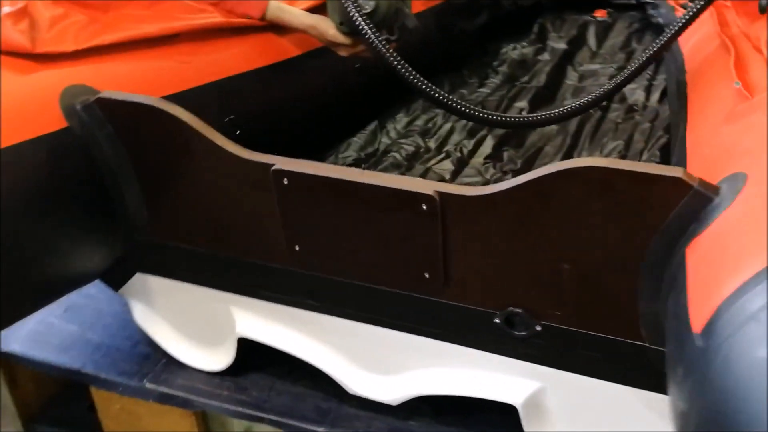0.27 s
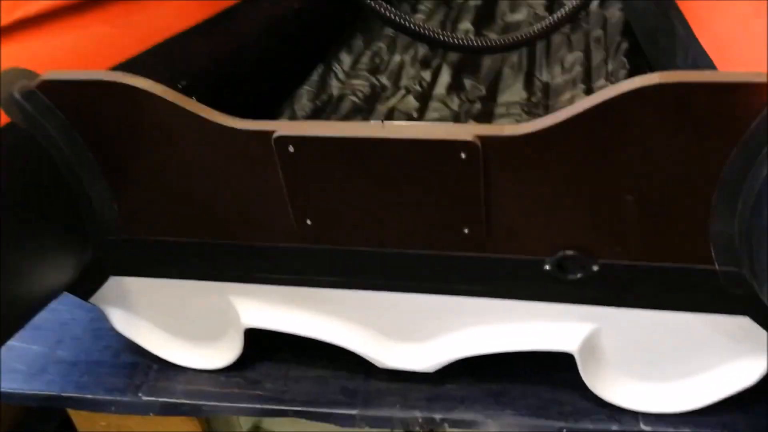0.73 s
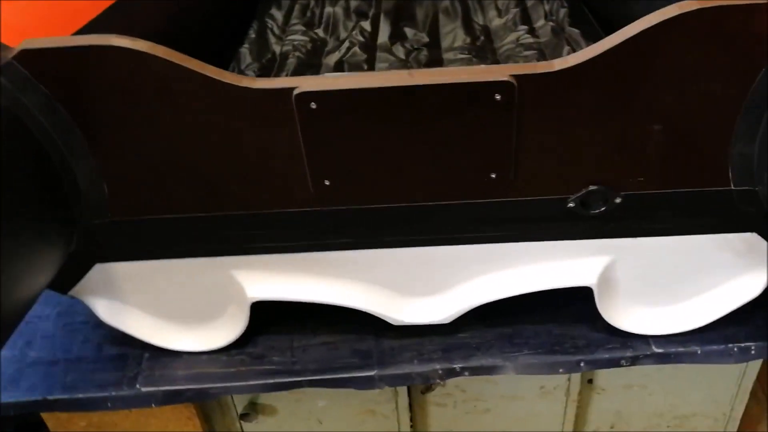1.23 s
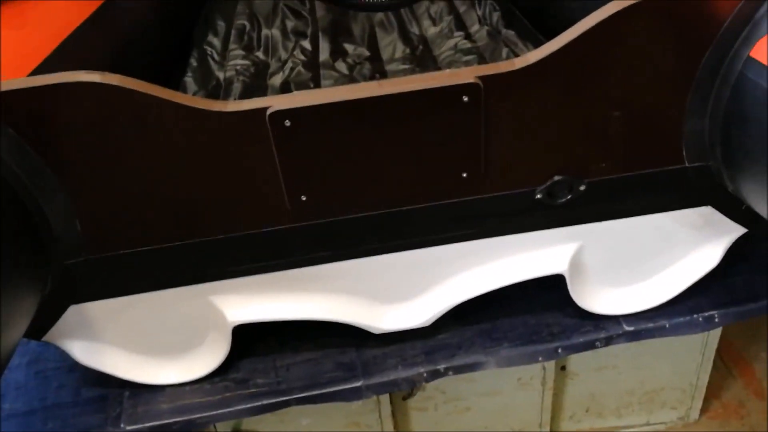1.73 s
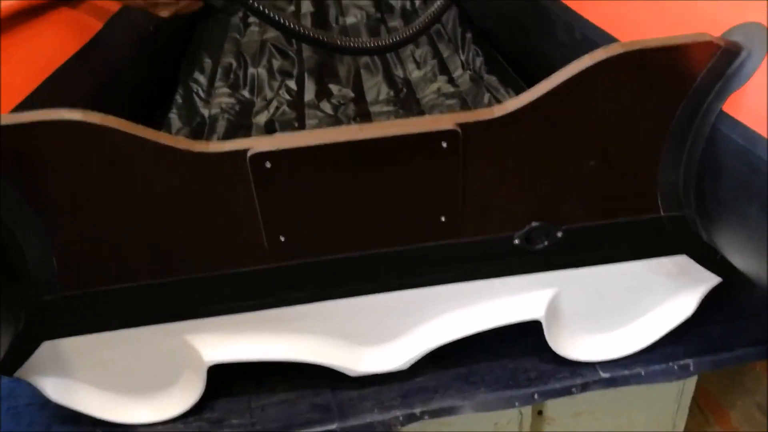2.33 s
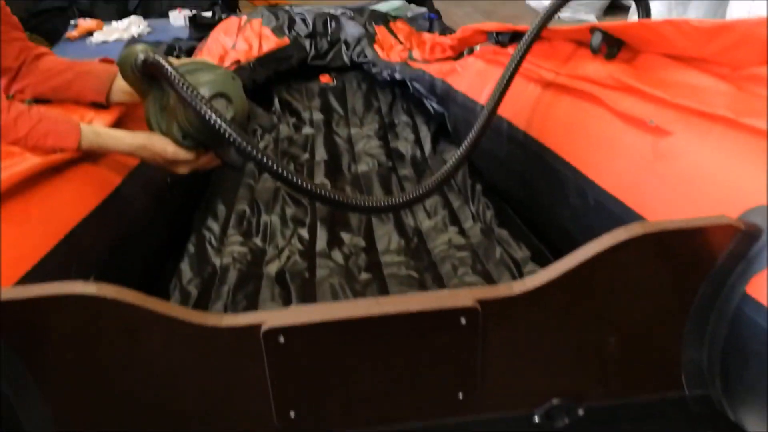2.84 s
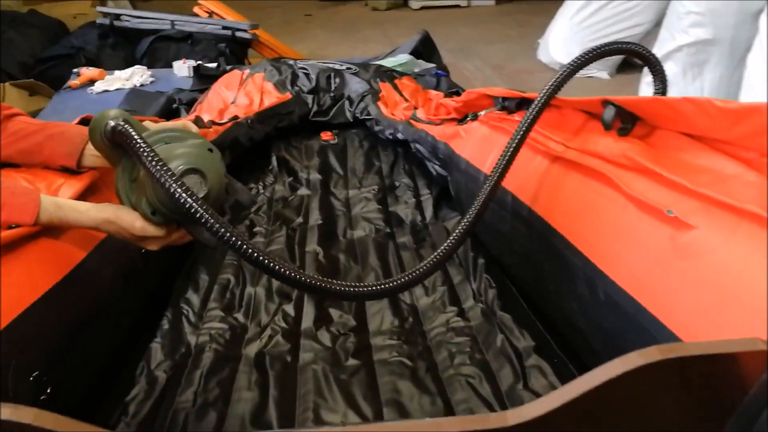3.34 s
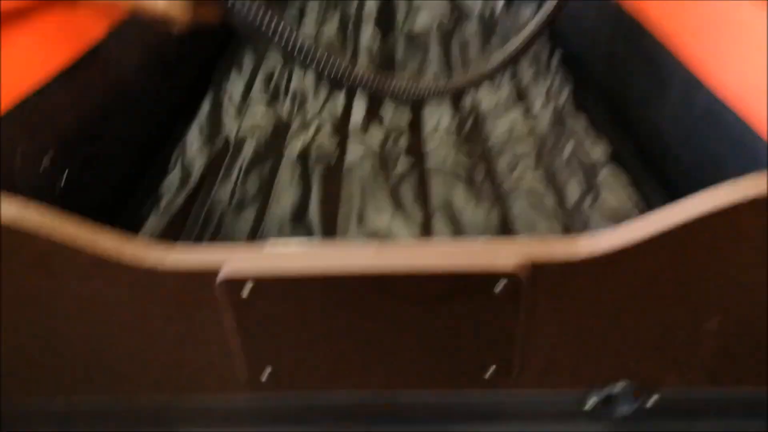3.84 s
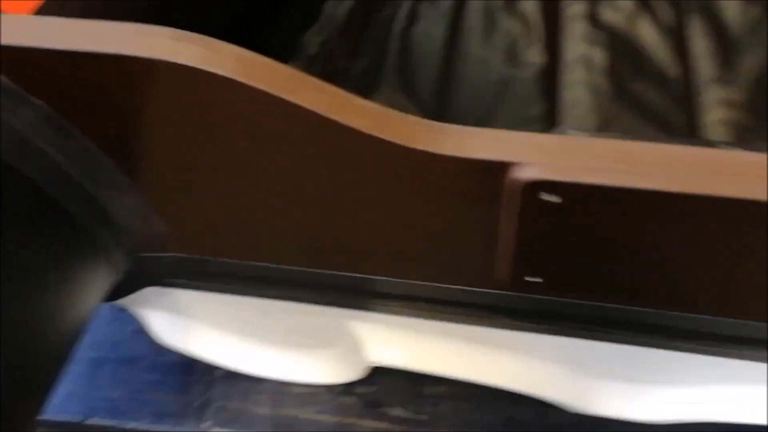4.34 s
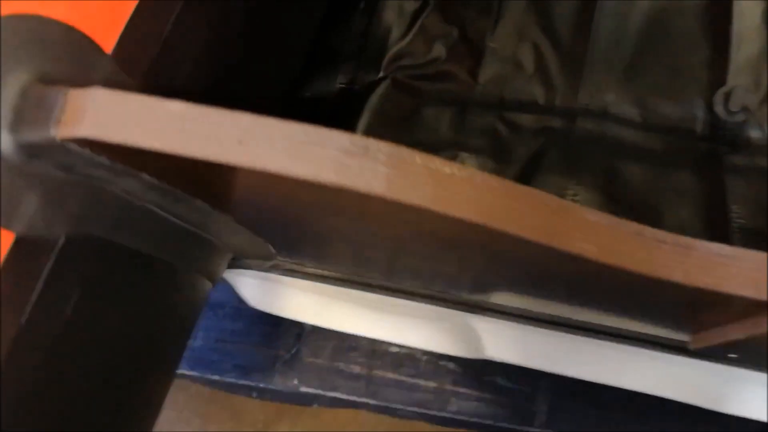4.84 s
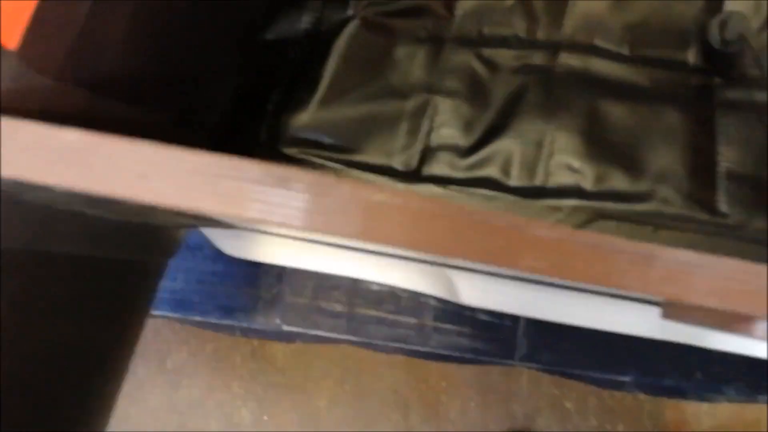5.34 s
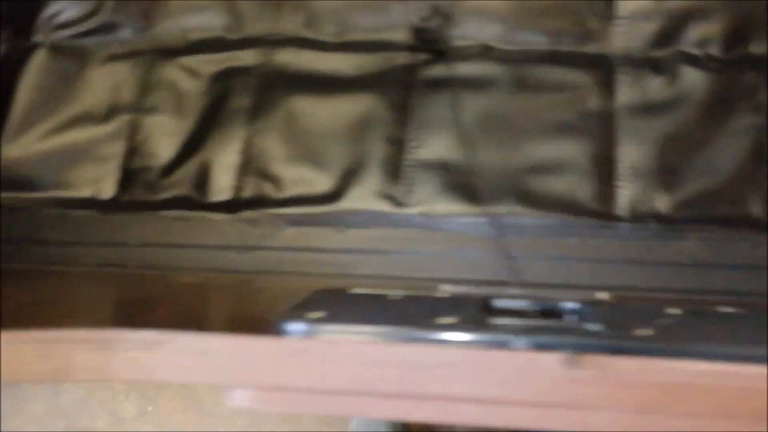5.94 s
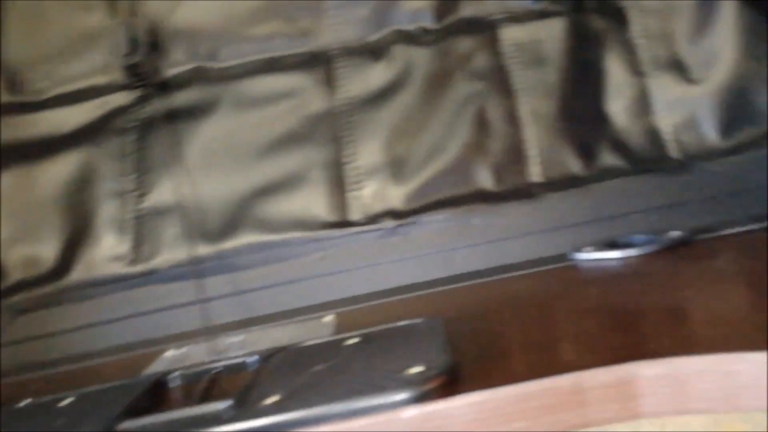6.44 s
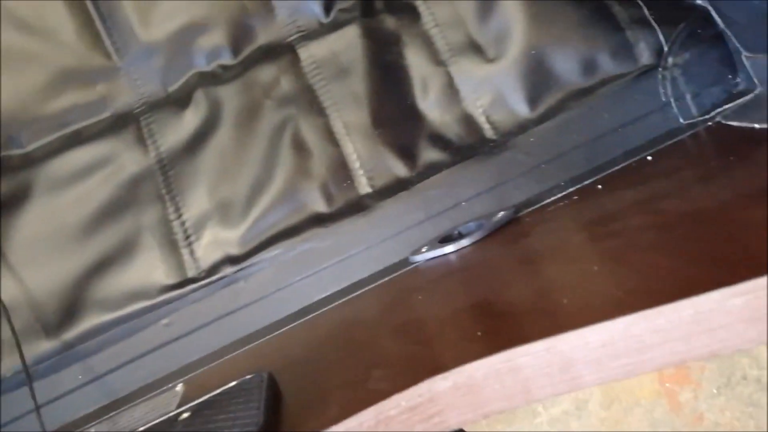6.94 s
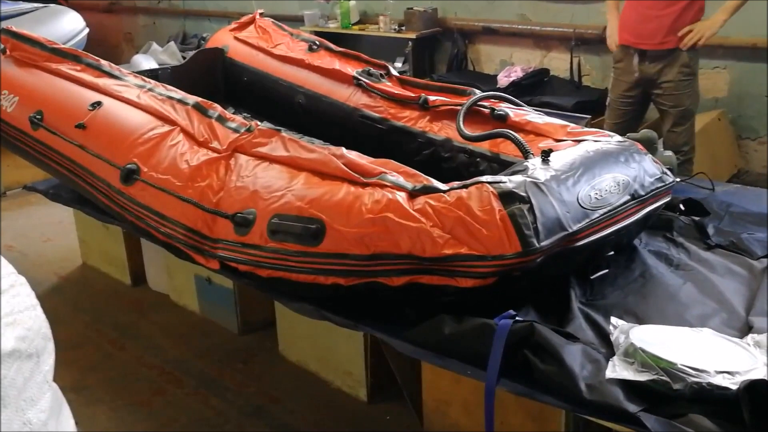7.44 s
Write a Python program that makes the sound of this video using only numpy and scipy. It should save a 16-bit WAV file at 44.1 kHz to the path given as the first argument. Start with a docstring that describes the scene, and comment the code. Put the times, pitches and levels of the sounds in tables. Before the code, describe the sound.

From 0 s an electric air pump runs close by, blowing through a ribbed hose into an inflatable boat: a broad, bright, sizzling rush with a high whine near 4 kHz, fluttering and barely rising, over faint low hum and room rumble. Between 0.1 and 1 s soft, low thumps and draught buffet the handheld microphone; hollow resonances shift as it moves. At about 3.8 s the pump is switched off; two strong bumps of air follow at 4.0 and 4.2 s. The fan coasts down, its harmonics sliding lower and flaring into brief whistles from 4 to 5.2 s, while nearby hiss swells, then dulls and weakens. From 5.2 s a thin, rough whine sinks intermittently, with faint low hum after 6.2 s. Around 7.13 s comes a tiny break, then steady pump hiss from farther off, with faint fixed high tones and low rumble, until the end near 7.6 s.

```python
"""An electric air pump blows through a ribbed hose into an inflatable boat; a phone is carried past the stern.
Under power, shaped noise hisses, shaft harmonics whine, and low noise bursts thump as a draught on the microphone.
Switched off, the seven-blade fan coasts down: its harmonics fall and flare into whistles, then a thin whine sinks.
After a short break the pump runs steadily further away: hiss, fixed faint tones and a low rumble."""
import sys
import numpy as np
from scipy import signal
from scipy.fft import rfft, irfft
from scipy.io import wavfile

SR = 44100
rng = np.random.default_rng(int(sys.argv[2]) if len(sys.argv) > 2 else 0)


def digitize_waveform(pressure):
    """Quantize a signal to 16-bit integers and store it at the path in sys.argv[1].

    Rows of a 2-D input are taken as channels; values are limited to [-1, 1].
    """
    field = np.atleast_2d(pressure).T
    bounded = np.clip(field, -1, 1)
    quanta = np.round(bounded * 32767).astype(np.int16)
    wavfile.write(sys.argv[1], SR, quanta)


N = 338688
T = np.arange(N) / SR
BINS_HZ = np.arange(N // 2 + 1) * SR / N

BLADES = 7
BLADE_HZ, CREEP_HZ_PER_S = 4101, 8.3  # blade-passing rate at time 0, and its rise under power
OFF_S, DRAG_S, FRICTION_HZ_PER_S = 3.816, 1.348, 128.3  # air drag alone halves the speed in DRAG_S
BREAK_S = 7.129


def undb(db):
    """Amplitude of a level in dB."""
    return 10 ** (np.asarray(db) / 20)


def unit(x):
    """Scale to RMS 1 over all channels."""
    return x / np.sqrt(np.mean(x ** 2))


def curves(rows):
    """Each column of a table, joined by straight lines in time."""
    time_s, *columns = np.transpose(rows)
    return [np.interp(T, time_s, column) for column in columns]


def colour_db(points):
    """dB per bin of a (frequency [Hz], level [dB]) table, straight over log frequency."""
    hz, db = np.transpose(points)
    return np.interp(np.log(BINS_HZ + 1), np.log(hz), db)


def colour(points):
    """Gain per bin of a (frequency [Hz], level [dB]) table."""
    return undb(colour_db(points))


def band(lo_hz, hi_hz, order=8):
    """Gain per bin of a Butterworth-shaped band-pass."""
    low_cut = 1 + (lo_hz / (BINS_HZ + 1)) ** (2 * order)
    high_cut = 1 + (BINS_HZ / hi_hz) ** (2 * order)
    return 1 / np.sqrt(low_cut * high_cut)


def noise(gain, alike=0):
    """Stereo noise of RMS 1 and the given colour; a share of its power is common to both sides."""
    white = rng.standard_normal((3, N))
    mixed = np.sqrt(alike) * white[2] + np.sqrt(1 - alike) * white[:2]
    return unit(irfft(rfft(mixed) * gain, N))


def pan(db):
    """Left and right gains of constant total power; db is left minus right."""
    gains = undb(np.array([[.5], [-.5]]) * db)
    return gains / np.sqrt(np.mean(gains ** 2, axis=0))


def walk(rate_hz):
    """Smooth random curve of RMS 1, low-passed around rate_hz."""
    return unit(irfft(rfft(rng.standard_normal(N)) * np.exp(-(BINS_HZ / rate_hz) ** 2), N))


def swell(centre_s, half_s):
    """Smooth rise and fall around a moment."""
    return np.square(.5 + .5 * np.cos(np.pi * np.clip((T - centre_s) / half_s, -1, 1)))


def spell(start_s, end_s, release_s, attack_s=0.031):
    """Linear attack, hold and release."""
    return np.clip(np.minimum((T - start_s) / attack_s, 1 - (T - end_s) / release_s), 0, 1)


def whine(hz, wobble=.001, flutter_db=3, port_phase_rad=0.46):
    """Rotor tone: the shaft wobbles in pitch, the air stream shakes the level at each port."""
    phase = 2 * np.pi * np.cumsum(hz * (1 + wobble * walk(23.5))) / SR
    ports = [np.sin(phase - side * port_phase_rad) * undb(flutter_db * walk(33)) for side in range(2)]
    return unit(np.array(ports))


def blade_rate():
    """Blade-passing rate [Hz]: slow creep under power, then air drag and bearing friction."""
    coast_s = np.maximum(T - OFF_S, 0)
    at_power_hz = BLADE_HZ + CREEP_HZ_PER_S * np.minimum(T, OFF_S)
    return at_power_hz / (1 + coast_s / DRAG_S) - FRICTION_HZ_PER_S * coast_s


def speed_db():
    """Fan speed in dB re BLADE_HZ."""
    return 20 * np.log10(blade_rate() / BLADE_HZ)


def sizzle_peak(centre_hz=8650, width_hz=1300, boost_db=2):
    """Resonance that gives the hiss its edge."""
    return undb(boost_db / (1 + ((BINS_HZ - centre_hz) / (width_hz / 2)) ** 4))


def hull_echoes(x, share=0.14, drift_s=0.000174):
    """Reflections from tubes and transom; their paths drift as the phone moves, so the hiss phases."""
    out = x.copy()
    for side in range(2):
        for lag_s in (.0013, .0031, .0057, .011):
            out[side] += share * np.interp(T - lag_s - drift_s * walk(0.92), T, x[side])
    return out / np.sqrt(1 + 4 * share ** 2)


# air noise, nominal: (low edge [Hz], high edge [Hz], level at full speed [dB], loss per dB of speed [dB/dB],
# share of closeness gain [1], change when facing the pump [dB], share of turn [1])
AIR_BANDS = [(590, 2650, -31, 0.8, 0.2, -0.5, 0.74), (2820, 7760, -22, 1.25, 0.36, 2, 1.0),
             (8220, 9020, -19.5, 1.88, 0.72, -3, 0.63), (11320, 17000, -26.5, 1.93, 0.96, 0, 0.22)]
# hiss colour under power: (frequency [Hz], relative level per Hz [dB])
RUN_COLOUR = [(240, -59), (400, -34), (543, -28), (605, -22.5), (886, -19.5), (1150, -13), (1380, -19),
              (3210, -9), (3790, -14), (4220, -10.5), (7100, -10), (8530, -3.5), (9650, -5.5),
              (10600, -13.5), (15500, -28)]
# hiss colour while coasting: (frequency [Hz], relative level per Hz [dB])
COAST_COLOUR = [(240, -46), (400, -6), (595, -10), (738, -0.5), (886, -2.5), (1450, -2.5), (1820, -4),
                (2220, -3), (3360, -3.5), (3850, -3.5), (4220, -4), (6990, -8.5), (8930, 4.5),
                (12100, -3.5), (15500, -14)]
# port imbalance before an overall offset: (frequency [Hz], left minus right [dB])
EAR_TILT = [(500, 0.5), (2000, -5), (3500, -1), (6500, -1), (8300, 14), (9300, 4), (10500, -0.5),
            (12500, -16), (15500, -8)]
# gain near the air stream, before each band's share: (time [s], gain [dB])
CLOSENESS = [(0, -3.5), (1.4, 1.5), (2.6, 0), (3.85, 1.5), (4.08, 0.5), (4.3, 6.5), (4.77, 7.5), (5.25, 7),
             (5.9, 3.5), (7.05, -1.5)]
# turning phone, before offset and share: (time [s], left minus right [dB])
TURN = [(0.05, 1.5), (3.44, 6.5), (4.64, 0.5), (5.48, 0.5), (5.52, 2), (5.79, 4), (6.26, 2.5), (7.04, 6.5)]


def air(side_db=5.0, dulling_s=1.0, facing_s=3.39, facing_half_s=1):
    """Turbulence in hose and intake: rush, hiss, sizzle and thin top, weaker and duller as the fan slows."""
    close_db, = curves(CLOSENESS)
    turn_db = curves(TURN)[0] - side_db
    facing, slowed_db = swell(facing_s, facing_half_s), speed_db()
    coasting = np.clip((T - OFF_S) / dulling_s, 0, 1)
    ears = pan(side_db + colour_db(EAR_TILT))
    out = 0
    for lo_hz, hi_hz, db, steepness, closing, facing_db, turning in AIR_BANDS:
        zone = band(lo_hz, hi_hz) * ears
        driven = noise(zone * colour(RUN_COLOUR) * sizzle_peak(), alike=0.033)
        free = noise(zone * colour(COAST_COLOUR), alike=0.06)
        stream = np.sqrt(1 - coasting) * driven + np.sqrt(coasting) * free
        level_db = db + steepness * slowed_db + closing * close_db + facing_db * facing
        out = out + stream * undb(level_db + 0.88 * walk(20)) * pan(turning * turn_db)
    return hull_echoes(out)


# shaft harmonics, before flutter: (multiple of shaft rate [1], level under power re WHINE_LEVEL [dB],
# level at start of coasting [dB], left minus right [dB])
HARMONICS = [(1, -40, -59, 0), (2, -22, -62, 0), (7, -13, -54, 5), (14, -1, -50, 5), (16, -2, -60, 6),
             (21, -18, -48, 0), (28, -30, -48, -5), (35, -40, -51, -5), (49, -40, -50, -2)]
# whine under power: (time [s], level [dB])
WHINE_LEVEL = [(0, -30.5), (.7, -32), (1.5, -28.5), (2.1, -32), (2.7, -26), (3.1, -32), (3.5, -29),
               (3.85, -31)]
# harmonics flaring as their beams cross the microphone, before flutter: (time [s], half length [s],
# multiple of shaft rate [1], level [dB], left minus right [dB])
WHISTLES = [(1.5, 1.1, 7, -37, -2), (3.6, 1.03, 7, -35, 10), (3.92, .25, 21, -40, -4),
            (4.047, 0.2, 14, -31, 3), (4.16, .16, 21, -33, 7), (4.243, .22, 14, -32.5, -2),
            (4.28, .2, 28, -38, -5), (4.387, .16, 21, -25.5, 3), (4.495, 0.17, 1, -45, -1),
            (4.52, .2, 28, -35, -6), (4.57, .17, 21, -35.5, 2), (4.76, .2, 14, -37, 2),
            (4.78, .15, 35, -29, -5), (5.02, 0.72, 1, -50, 0), (5.05, .35, 49, -42.5, -8),
            (5.06, .15, 35, -38, 0), (5.13, 0.25, 14, -34, 1), (5.55, .3, 49, -43, 0),
            (5.94, .25, 49, -39, 3), (6.38, .3, 7, -50, 2)]


def fan(wobble=0.00031, coast_wobble=.0012, flutter_db=4.0, beam_db=3, coast_steepness=0.91, handover_s=0.16):
    """Harmonics of one shaft, mostly at blade-rate multiples; all fall together, some flare into whistles."""
    shaft_hz = blade_rate() / BLADES
    unsteady = np.where(T > OFF_S, coast_wobble, wobble)  # a slowing rotor turns less evenly
    shaft_rad = 2 * np.pi * np.cumsum(shaft_hz * (1 + unsteady * walk(49))) / SR
    flutter = undb(flutter_db * np.array([walk(17), walk(30)]))
    beams = undb(beam_db * walk(4))
    coasting = np.clip((T - OFF_S) / handover_s, 0, 1)
    driven = (1 - coasting) * undb(curves(WHINE_LEVEL)[0])
    free = coasting * undb(coast_steepness * speed_db())
    out = 0
    for multiple, run_db, coast_db, pan_db in HARMONICS:
        own_beams = np.roll(beams, rng.integers(N))
        gain = pan(pan_db) * (undb(run_db) * driven + undb(coast_db) * free * own_beams)
        for time_s, half_s, which, db, flare_pan_db in WHISTLES:
            if round(which) == round(multiple):
                gain = np.maximum(gain, undb(db) * pan(flare_pan_db) * swell(time_s, half_s))
        ports_rad = np.array([[0], [multiple / BLADES / 4]])  # right port leads, high harmonics most
        tone = np.sqrt(2) * np.sin(round(multiple) * shaft_rad + ports_rad)
        tone = tone * (multiple * shaft_hz < SR / 2)
        out = out + gain * tone * np.roll(flutter, rng.integers(N), axis=1)
    return out


# spells of the sinking whine: (start [s], end [s], release [s], level [dB])
SLOW_SPELLS = [(5.22, 5.52, 0.31, -39.5), (5.9, 6.08, .12, -50), (6.233, 6.42, .1, -42.5),
               (6.658, 7.08, .05, -50)]


def slow_whine(start_s=5.22, start_hz=5198, sink_per_s=.281):
    """Thin, rough tone that sinks exponentially, coming and going late in the run-down."""
    hz = start_hz * np.exp(-sink_per_s * np.maximum(T - start_s, 0))
    tone = whine(hz, wobble=0.0019, flutter_db=2.5)
    return tone * sum(undb(db) * spell(start, end, release) for start, end, release, db in SLOW_SPELLS)


# hollows between tubes and transom ring in the air noise: (time [s], half length [s], centre [Hz],
# width [Hz], peak level [dB], left minus right [dB])
HOLLOWS = [(0.8, 2.1, 1980, 450, -39, -6), (3.45, 1, 4750, 260, -34, 10), (1.487, 1.3, 251, 12, -49.5, 0),
           (2.1, 1.3, 1200, 220, -58, -8), (3.24, 0.84, 250, 10, -46.5, 0), (3.4, 1.6, 1560, 200, -43, -2),
           (4.407, 1.15, 1740, 260, -40, 2), (4.653, 0.59, 11900, 1600, -27.5, -13),
           (4.7, 0.89, 2570, 480, -34, 28), (4.86, 0.37, 8750, 300, -27, 20),
           (5.162, 0.9, 2220, 100, -37.5, 1), (5.5, 1.6, 1495, 450, -39, -3), (7.003, .12, 310, 80, -47, 4)]


def hollows():
    """Boat resonances as bands of noise, each swelling as the phone passes."""
    out = 0
    for centre_s, half_s, hz, width_hz, db, pan_db in HOLLOWS:
        ring = noise(band(hz - width_hz / 2, hz + width_hz / 2, order=24), alike=0.92)
        out = out + ring * undb(db) * pan(pan_db) * swell(centre_s, half_s)
    return out


# draught colour: (frequency [Hz], relative level per Hz [dB])
DRAUGHT_COLOUR = [(15, -39), (25, -7), (102, -3.5), (167, -4), (216, -5.5), (266, -6.5), (565, -11),
                  (1050, -10), (1500, -1), (1950, -47), (3300, -120)]
# spells of draught: (start [s], end [s], release [s], level [dB])
DRAUGHTS = [(0.234, 0.928, 0.14, -33.5), (1.002, 1.17, 0.13, -39.5), (1.713, 1.85, 0.11, -62),
            (2.5, 3.35, .1, -54.5), (3.444, 3.577, 0.061, -35), (3.65, 4.177, .07, -34),
            (6.247, 6.853, 0.15, -54.5)]
# gusts: (time [s], peak before trim_db [dB], bright part re low part before bright_trim_db [dB])
THUMPS = [(0.12, -16.5, -35), (0.279, -6.5, -10.5), (0.323, -14.5, -27), (0.466, -6.5, -11.5),
          (0.515, -10, -8), (0.547, -12.5, -17), (0.607, -12.5, -10), (0.643, -12.5, -13),
          (0.667, -13, -20), (0.86, -14, -22), (0.939, -17, -29), (1.465, -24, -30), (4.032, -0.5, -11.5),
          (4.173, -4, -12.5)]
# the draught meets one port first and harder, then the other once the phone has turned:
# (time [s], delay of right port [s], left minus right of bright part [dB])
WINDWARD = [(2, .001, 10), (3.4, -.0008, -15)]


def draught(rise_s=0.0039, fall_s=0.014, still_air_db=-57.5, trim_db=-4.5, bright_trim_db=7.0):
    """Moving air rumbles on the microphone in spells; single gusts thump, some brighter than others."""
    spells = sum(undb(db) * spell(start, end, release) for start, end, release, db in DRAUGHTS)
    strength = undb(still_air_db) + spells
    shape = colour(DRAUGHT_COLOUR)
    lag_s, windward_db = curves(WINDWARD)
    out = noise(shape * band(26, 323, order=2), alike=0.73) * strength * undb(2.9 * walk(12))
    low = noise(shape * band(70, 300, order=2), alike=.9)
    high = noise(shape * band(260, 850, order=4), alike=0.18) * pan(windward_db)
    for time_s, peak_db, bright_db in THUMPS:
        near = np.abs(T - time_s) < .08
        age_s = T[near] - time_s - rise_s
        envelope = np.exp(np.minimum(age_s / rise_s, -age_s / fall_s))
        gust = (low[:, near] + undb(bright_db + bright_trim_db) * high[:, near]) * envelope
        out[:, near] += undb(peak_db + trim_db) * gust / np.abs(gust).max()
    out[1] = np.interp(T - lag_s, T, out[1])
    return out


# low drones: (start [s], end [s], release [s], frequency [Hz], level [dB])
DRONES = [(-.1, 1.1, 3.3, 187.5, -43.5), (3.3, 3.85, .2, 187.3, -48), (6.25, 6.467, 0.056, 202, -44.5),
          (6.51, 6.683, 0.28, 223, -45.5), (7.033, 7.13, .05, 225.4, -45.5)]


def drone():
    """Low hum that fades while the motor runs, and later returns a little higher."""
    out = 0
    for start_s, end_s, release_s, hz, db in DRONES:
        hum = whine(np.full(N, hz), wobble=0.0045, flutter_db=0.5, port_phase_rad=0.3)
        out = out + hum * undb(db) * spell(start_s, end_s, release_s)
    return out


def boom(hz=100, peak_db=-36, start_s=7.05, rise_s=.04):
    """Soft low sine that rises just before the break."""
    return undb(peak_db) * np.sin(2 * np.pi * hz * T) * np.clip((T - start_s) / rise_s, 0, 1)


# far hiss colour: (frequency [Hz], relative level per Hz [dB])
FAR_COLOUR = [(35, -68), (60, -43), (187, -22), (242, -18), (285, -20.5), (376, -16.5), (443, -20),
              (559, -25), (599, -16), (1350, -13.5), (1630, -12.5), (4030, -6), (5710, -9), (8470, -6),
              (15500, -23)]
# steady tones of the far pump, before swell_db: (frequency [Hz], level [dB])
FAR_TONES = [(248, -56.5), (376, -54.5), (561, -55.5), (3923, -42), (7846, -40), (11769, -49)]


def far_pump(swell_in_s=7.05, return_s=7.16, swell_db=2.0, tail_db=-13, tail_s=0.0067):
    """Steady hiss, faint tones and low rumble of the pump from further off; it rises under the close sound
    until the scene changes, drops out briefly, then returns."""
    ears = pan(6.1 + colour_db(EAR_TILT))
    sizzle = sizzle_peak(centre_hz=8770, width_hz=2070, boost_db=9.5)
    hiss = noise(colour(FAR_COLOUR) * sizzle * ears, alike=0.074)
    tones = sum(undb(db) * whine(np.full(N, hz), wobble=0.0011, flutter_db=0.0) for hz, db in FAR_TONES)
    rumble = noise(band(25, 130, order=2), alike=0.85)
    swell_in = undb(swell_db) * np.clip((T - swell_in_s) / (BREAK_S - swell_in_s), 0, 1) ** 1.5
    tail = undb(tail_db) * np.exp(-np.maximum(T - BREAK_S, 0) / tail_s)
    back = np.clip((T - return_s) / 0.0024, 0, 1)
    pump = undb(-21.5) * hiss + tones + undb(-59.5) * rumble
    return pump * np.where(T < BREAK_S, swell_in, tail + back)


# room rumble colour: (frequency [Hz], relative level per Hz [dB])
ROOM_COLOUR = [(15, -50), (25, -24), (112, -4.5), (141, -8), (186, -1.5), (274, -3), (387, -5.5),
               (425, -5.5), (600, -9.5), (780, -43), (1320, -120)]


def workshop(port_lag_s=0.00054):
    """Low rumble of the room, reaching the left port a little before the right."""
    rumble = noise(colour(ROOM_COLOUR) * band(120, 530, order=3), alike=1.0)
    rumble[1] = np.interp(T - port_lag_s, T, rumble[1])
    level_db = np.interp(T, [0, 2.5, 4.5, 5.5, 7], [-44.5, -50.5, -46.5, -49.5, -50.5])
    return rumble * undb(level_db)


def scene():
    """Close pump and room until the break, then the pump from further off."""
    near = air() + hollows() + fan() + slow_whine() + draught() + drone() + workshop() + boom()
    return near * np.clip((BREAK_S - T) / 0.0015, 0, 1) + far_pump()


def record(dry, top_hz=15850):
    """The phone cuts the top: steep elliptic low-pass."""
    return signal.sosfilt(signal.ellip(10, .2, 80, top_hz, fs=SR, output="sos"), dry)


dry = scene()
out = record(dry)
digitize_waveform(out)
```